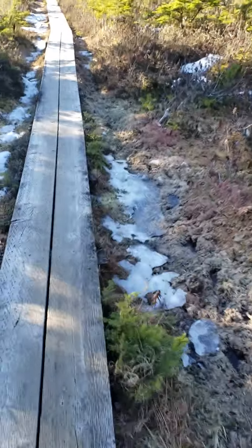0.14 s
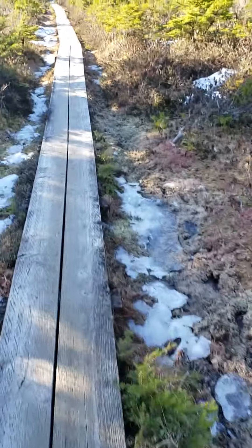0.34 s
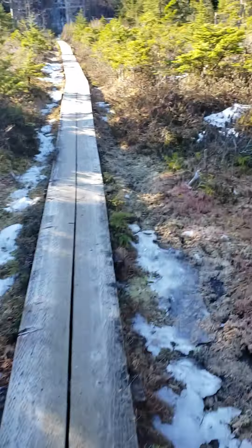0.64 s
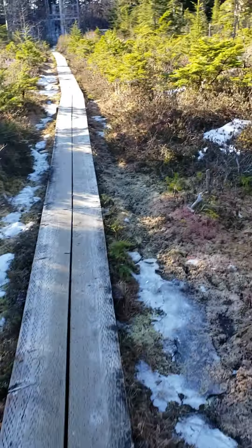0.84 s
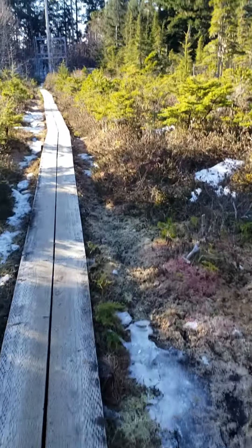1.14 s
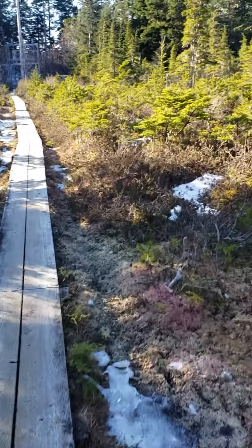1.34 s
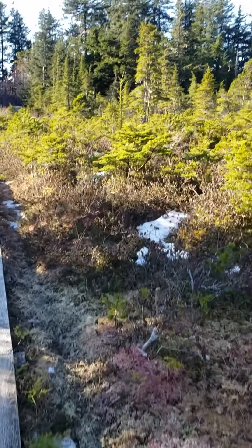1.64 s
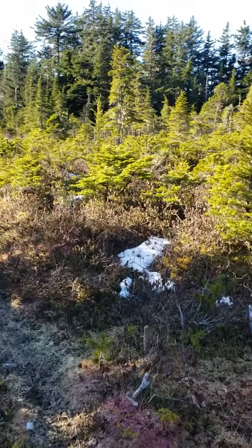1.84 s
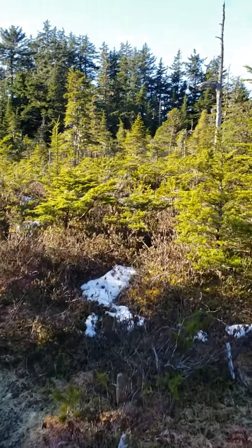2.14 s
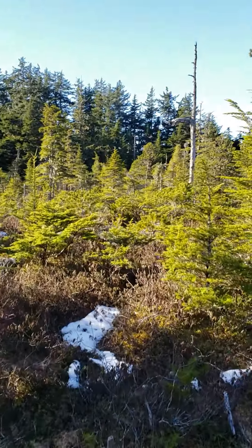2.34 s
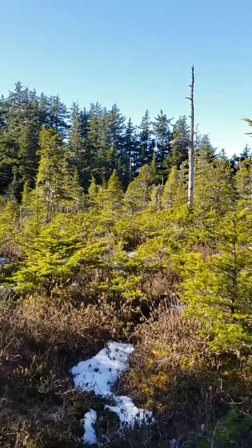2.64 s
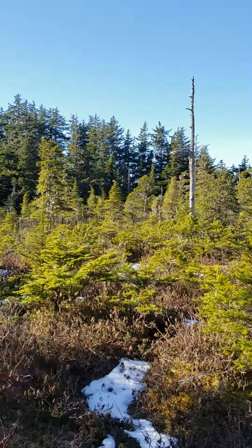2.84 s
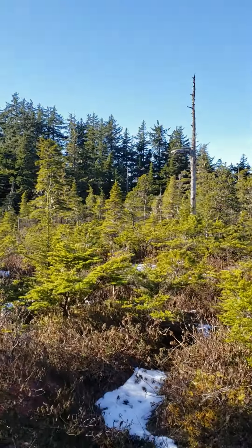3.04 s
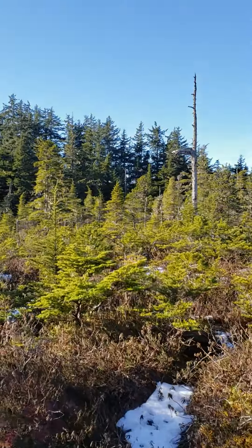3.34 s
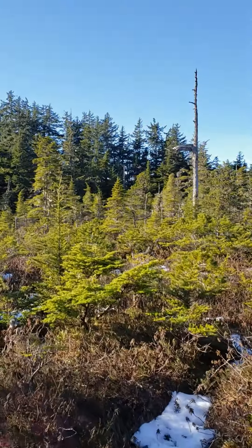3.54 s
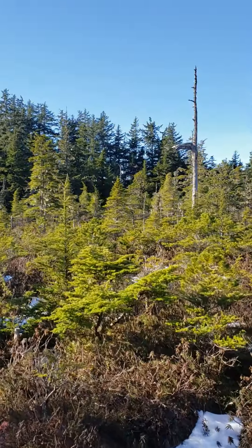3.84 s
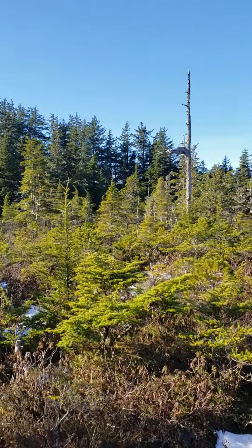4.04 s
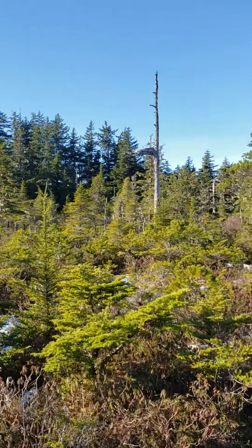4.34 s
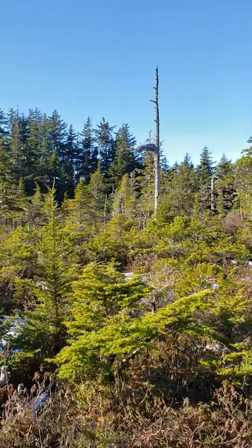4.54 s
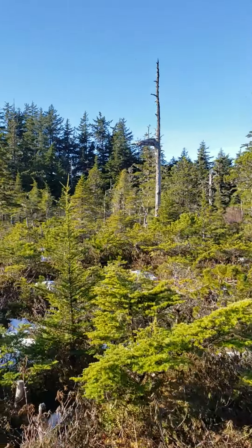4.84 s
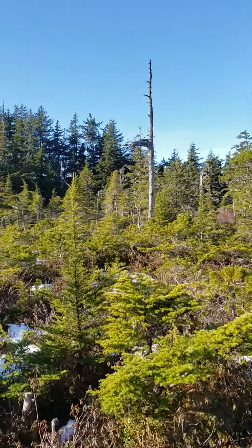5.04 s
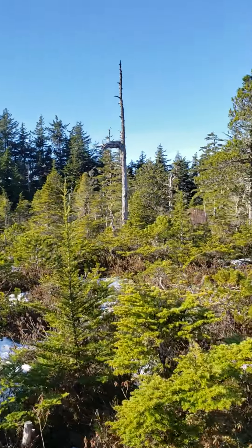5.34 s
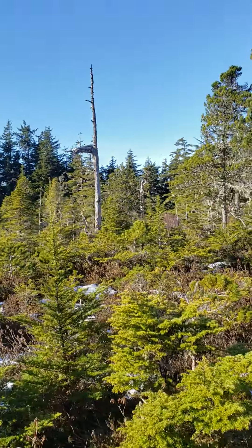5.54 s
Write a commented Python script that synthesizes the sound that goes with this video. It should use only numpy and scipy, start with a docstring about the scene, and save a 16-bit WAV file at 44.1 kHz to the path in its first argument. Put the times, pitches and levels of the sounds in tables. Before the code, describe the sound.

Close handheld phone pickup of a walker on wooden boards outdoors: about ten dull, resonant footfalls, roughly one every 0.57 seconds, with slight tread creaks and loose-plank taps. Short cloth swishes fall between the steps over thin jacket hiss. The air is nearly silent, a faint distant forest murmur, then low breeze buffets mainly the right channel. Sharp gritty crunches come near 2.3 and 3.4 seconds.

```python
"""Someone walks along a plank boardwalk over a bog, phone in hand, under a faint open-air murmur (noise).
From the start, heels and soles thud (sinking sines) and knock (ringing plank modes), treads creak,
loose planks knock in between, trouser legs swish and a jacket rustles (grains and coloured noise).
A sleeve whistles thinly (narrow noise) from about 1.1 s; soon after, a light breeze (low noise) starts
to buffet the right microphone. Grit cracks (bursts of grains) at 2.3 s and twice near 3.3 s."""
import sys
import numpy as np
from scipy import signal
from scipy.fft import rfft, irfft, next_fast_len
from scipy.io import wavfile
from scipy.ndimage import uniform_filter1d

SR = 44100
rng = np.random.default_rng(int(sys.argv[2]) if len(sys.argv) > 2 else 0)


def store_pcm(level_fs):
    """Save levels as 16-bit WAV."""
    pcm = np.round(np.clip(level_fs, -1, 1) * 32767).astype(np.int16)
    wavfile.write(sys.argv[1], SR, np.atleast_2d(pcm).T)


N = 250840
TIME = np.arange(N) / SR
AGE = np.arange(int(0.4 * SR)) / SR  # seconds since a blow

# jacket rustle: t/s, level/dB, top treble relative/dB, lower treble relative/dB (before trims)
JACKET_RUSTLE = [(0.0, -56, 3, -17), (0.2, -67, 1, -5), (0.37, -64, 2.5, 6.5), (0.64, -63, 1.5, -3),
                 (1.2, -65.5, 3, 7.5), (1.33, -59.5, 6.5, 2.5), (1.7, -67, 6, 3), (1.77, -74.5, 5.5, 8),
                 (2.28, -66.5, 0.5, -0.5), (2.32, -63.5, 2, 12.5), (2.85, -67, -1.5, -9),
                 (3.27, -69.5, 2, -15), (3.37, -63.5, 4.5, 5), (3.57, -63.5, 1, -24),
                 (4.52, -65.5, 2, -1.5), (4.76, -68, -2, -7), (4.92, -66.5, -1.5, -1),
                 (5.68, -68.5, -3.5, -8.5)]
# higher ringing modes of a plank: f/Hz, level/dB, t60/s (time to fall by 60 dB)
PLANK_MODES = [(386, 1, 0.12), (443.4, -0.5, 0.16), (501.6, 4.5, 0.06), (613, -2, 0.081), (677, -9.5, 0.22),
               (795, -0.5, 0.069), (913, -4, 0.032), (947, -6.5, 0.077), (1122, -1.5, 0.042),
               (1312, -7.5, 0.09), (1640, -40, 0.024), (2180, -18, 0.033)]
# heel strikes: t/s, thud/dB, pitch f/Hz, knock/dB, sag of the span/dB, ring t60/s (levels before trims)
HEEL_STRIKES = [(0.014, -21, 241.6, -56, -25, 0.045), (0.591, -29.5, 303.4, -47, -29, 0.093),
                (1.134, -25, 221, -54, -27, 0.032), (1.696, -27.5, 225, -54, -45, 0.069),
                (2.251, -23, 236, -51, -22, 0.067), (2.729, -24, 267, -52, -32, 0.045),
                (3.313, -30, 266.5, -41.5, -44, 0.15), (3.907, -29.5, 221, -49, -33.5, 0.053),
                (4.504, -24.5, 283, -51, -34.5, 0.036), (5.121, -30, 258, -54, -26.5, 0.052)]
# soles slapping down after the heel:
# t/s, thud/dB, pitch f/Hz, knock/dB, sag/dB, rub of the roll/dB (levels before trims)
SOLE_SLAPS = [(0.099, -42, 252, -51.5, -35, -69), (0.664, -41, 292, -52, -37, -67),
              (1.212, -38, 273, -51.5, -34, -72), (1.745, -42, 250, -57.5, -64, -59),
              (2.33, -36.5, 271, -46.5, -36.5, -60), (2.819, -35.5, 269, -59.5, -38, -56.5),
              (3.378, -24, 276, -40, -25, -52.5), (3.969, -26, 281, -49.5, -46, -53),
              (4.556, -30, 236, -46, -62, -53), (5.199, -39.5, 269, -53, -27, -61)]
SOLE_T60_S = 0.056


def undb(db):
    """Turn decibels into gain."""
    return 10 ** (np.asarray(db) / 20)


def unit(x):
    """Scale to an rms (average strength) of 1."""
    return x / np.sqrt(np.mean(x ** 2))


def colour(x, points):
    """Shape the spectrum with f/Hz, level/dB points, joined by lines over log frequency."""
    hz, db = np.transpose(points)
    size = next_fast_len(x.shape[-1] + SR // 10)
    f = np.maximum(np.fft.rfftfreq(size, 1 / SR), 1)
    gain = undb(np.interp(np.log(f), np.log(hz), db))
    return irfft(rfft(x, size) * gain, size)[..., :x.shape[-1]]


def noise(points):
    """Coloured noise, unrelated at the two microphone ports."""
    return unit(colour(rng.standard_normal((2, N)), points))


def walk(rate):
    """Smooth random wander with an rms of 1, taking about `rate` new values per second."""
    k = max(int(SR / rate), 1)
    steps = np.repeat(rng.standard_normal(N // k + 1), k)
    return unit(uniform_filter1d(steps, k)[:N])


def curve(rows):
    """Draw each column of a timed table as a line, sample by sample."""
    s, *columns = np.transpose(rows)
    return [np.interp(TIME, s, c) for c in columns]


def bump(s, width_s):
    """A smooth swell that peaks at time s."""
    return np.exp(-((TIME - s) / width_s) ** 2 / 2)


def fade(t60):
    """Exponential decay after a blow, down 60 dB after t60 seconds."""
    return np.exp(-np.log(1000) * AGE / t60)


def onset(rise_s):
    """Smooth build-up after a blow."""
    return 1 - np.exp(-(AGE / rise_s) ** 2)


def add(track, s, sound):
    """Mix a sound into a track at time s."""
    i = max(int(s * SR), 0)
    track[i:i + len(sound)] += sound[:N - i]


def grains(per_s, scatter_db):
    """A stream of tiny slips at random moments, of uneven size and random sign."""
    size = undb(scatter_db * np.minimum(rng.exponential(size=N), 3))
    happens = rng.random(N) < per_s / SR
    return rng.choice([-1, 1], N) * size * happens


def from_below(x):
    """Sound from the feet reaches the right port a moment before the left."""
    # lag of the left port behind the right: f/Hz, lag/s
    port_lag = [(300, 0.00022), (900, 0.00035)]
    size = next_fast_len(N + SR // 10)
    f = np.fft.rfftfreq(size, 1 / SR)
    lag = np.interp(f, *np.transpose(port_lag))
    left = irfft(rfft(x, size) * np.exp(-2j * np.pi * f * lag), size)[:N]
    return np.array([left, x])


def bog(level_db=-66):
    """Faint murmur of the distant forest: noise partly shared by both ports, slowly swelling."""
    # spectrum of the murmur: f/Hz, level/dB
    bog_colour = [(20, -3), (65, 6), (150, -12), (300, -7.5), (600, -17.5), (1200, -19), (2500, -28.5),
                  (5000, -48), (16000, -36)]
    air = from_below(noise(bog_colour)[0]) + 0.89 * noise(bog_colour)
    swell_db = 1.5 * walk(3)
    return air * undb(level_db + swell_db)


def breeze(left_db=-2, right_db=-1, eddy_db=2.5):
    """Eddies rumble on the right port; the sheltered left one catches more when a step jolts the phone."""
    # strength of the breeze at the phone, before trims: t/s, level/dB
    gusts = [(0.0, -75), (1.16, -67), (1.46, -42), (1.58, -52), (1.75, -37.5), (2.16, -67), (2.39, -71),
             (2.54, -40), (2.86, -29.5), (3.13, -35.5), (3.23, -42), (3.51, -38), (3.82, -52.5),
             (4.05, -32.5), (4.24, -50.5), (5.04, -32.5), (5.41, -39), (5.68, -35.5)]
    # spectrum of the rumble: f/Hz, level/dB
    breeze_colour = [(15, -44), (35, -11), (50, 2.5), (72, 3), (105, -3.5), (150, -15), (220, -27.5),
                     (350, -37), (700, -62), (2000, -94)]
    jolt_after_s, jolt_width_s = 0.11, 0.11
    jolt_top_db, lee_db = -48, -32.5  # ceiling of the jolted air; shelter of the left port; before trims
    gust, = curve(gusts)
    jolt = sum(bump(heel[0] + jolt_after_s, jolt_width_s) for heel in HEEL_STRIKES)
    rumble = noise(breeze_colour) * undb(eddy_db * walk(14))
    lee = colour(rumble[0], [(75, -2), (160, -7.0), (400, -10)])
    left = undb(gust + lee_db) + jolt * undb(np.minimum(gust, jolt_top_db))
    return np.array([lee * left * undb(left_db), rumble[1] * undb(gust + right_db)])


def sleeve(width=0.066):
    """As the arm turns, woven ribs slide over each other and whistle in a narrow band."""
    # slides of the sleeve: t/s at the loudest, level/dB, pitch f/Hz, half length/s
    slides = [(1.16, -67, 4530, 0.031), (1.412, -77, 4800, 0.15)]
    step = 1 + width  # frequency ratio from the centre to the edge of the band
    out = np.zeros((2, N))
    for s, db, hz, length in slides:
        band = [(hz / step ** 3, -35), (hz / step, -6), (hz, 0), (hz * step, -6), (hz * step ** 3, -35)]
        out += noise(band) * undb(db) * bump(s, length)
    return out


def resonance(level_db=-14, swell_db=2):
    """A narrow band of the rustle stands out, swelling and fading."""
    # spectrum of the narrow band: f/Hz, level/dB
    resonance_colour = [(1900, -27), (2200, 3), (2300, 4), (2400, -2.5), (2700, -30)]
    db, _, body = curve(JACKET_RUSTLE)
    return noise(resonance_colour) * undb(db + body / 2 + level_db + swell_db * walk(7.7))


def jacket(level_db=-1.5, top_db=1.5, lower_db=2, flutter_db=1.42):
    """A fine fabric hiss near the phone; its colour shifts as folds move and it eases after each heel."""
    # spectrum of the hiss: f/Hz, level/dB
    jacket_colour = [(300, 9.5), (1200, 7.5), (2300, -0.5), (2650, -2.5), (3700, -6.5), (4700, -5.5),
                     (6000, 1.5), (8000, 3), (16000, 6)]
    lull_after_s, lull_width_s, lull_db = 0.2, 0.068, -3
    db, bright, body = curve(JACKET_RUSTLE)
    lull = sum(bump(heel[0] + lull_after_s, lull_width_s) for heel in HEEL_STRIKES)
    hiss = noise(jacket_colour)
    top = colour(hiss, [(7000, -40), (9000, 0)])
    lower = colour(hiss, [(1200, -12), (2200, 0), (5000, 0), (6500, -20)])
    # the top is turned up or down; the lower treble is added on top
    hiss = hiss + top * (undb(bright + top_db) - 1) + lower * undb(body + lower_db)
    return hiss * undb(db + level_db + lull_db * lull + flutter_db * walk(60))


def trousers(level_db=-2, catch_db=3.5, spread=0.74, rise=1.2, fall=0.88):
    """Cloth slides over cloth in mid-stride, catching and slipping thread by thread."""
    # strokes of the legs, before trims:
    # t/s at the loudest, level/dB, half length/s before stretching, crisp edge relative/dB
    swishes = [(0.079, -63, 0.025, 0.5), (0.374, -56.5, 0.034, -5.5), (0.835, -57, 0.012, -13),
               (0.926, -51.5, 0.024, -26), (1.494, -57, 0.014, -14), (1.971, -59, 0.027, -19),
               (2.053, -54.5, 0.015, -21), (2.613, -60.5, 0.016, -20.5), (3.162, -58, 0.024, -28),
               (3.763, -58.5, 0.019, -14.5), (4.35, -52.5, 0.014, -33.5), (4.91, -65, 0.032, -13),
               (5.476, -54, 0.011, -28)]
    # spectrum of the cloth: f/Hz, level/dB
    trouser_colour = [(150, 0), (320, 6), (600, 1), (950, 5.5), (1300, 4.5), (1650, 2), (2200, -9.5),
                      (3200, -23.5), (5000, -33), (8000, -21), (16000, -40)]
    # spectrum of the crisp edge: f/Hz, level/dB
    edge_colour = [(1200, -20), (2000, 1), (3000, 14), (4500, 2.5), (7000, -3), (16000, -53)]
    snags_per_s, snag_db = 140, -5.5  # threads that snag and let go with a small tick
    slide, edge = np.zeros(N), np.zeros(N)
    for s, db, length, crisp in swishes:
        half_length = length * np.where(TIME < s, rise, fall)
        stroke = undb(db) * np.exp(-np.abs((TIME - s) / half_length) ** 1.28 / 2)
        slide += stroke
        edge += stroke * undb(crisp)
    threads = []
    for path in range(3):  # one shared by both ports, then one for each
        slips = unit(grains(900, 5.4))
        snags = undb(snag_db) * unit(grains(snags_per_s, 2.7))
        threads.append(unit(colour(slips + snags, trouser_colour)))
    cloth = from_below(threads[0]) + spread * np.array(threads[1:])
    catching = undb(catch_db * walk(110))
    return (cloth * slide * catching + noise(edge_colour) * edge) * undb(level_db)


def grit(crack_t60=0.019, tail_db=-26, level_db=1):
    """Grit under a sole cracks sharply and crumbles into tiny fragments."""
    # cracks, before the level trim: t/s, level/dB
    cracks = [(2.328, -35.5), (3.313, -56), (3.379, -39.5)]
    # spectrum of the fragments: f/Hz, level/dB
    grit_colour = [(300, -13), (900, 9), (2000, 15.5), (3500, -5), (6000, -3.5), (11000, -3), (16000, 8.5)]
    crush = np.zeros(N)
    snap, crumble = onset(0.0003), fade(0.2)
    for s, db in cracks:
        add(crush, s, undb(db + level_db) * snap * (fade(crack_t60) + undb(tail_db) * crumble))
    fragments = np.array([grains(6000, 3) for port in range(2)])
    return crush * unit(colour(fragments, grit_colour))


def bending_wave(hz, t60, glide=1.0, glide_s=0.0029, sink=0.95, rise_s=0.0072, after_db=-23, after_t60=0.32):
    """Short bending waves run fastest along a plank, so the thud sinks in pitch; nearby boards ring on."""
    cycles = hz * (sink * AGE + glide * glide_s * (1 - np.exp(-AGE / glide_s)))
    swell = 0.23 * onset(0.0048) + onset(rise_s)
    direct = -np.sin(2 * np.pi * cycles) * swell * fade(t60)
    boards = 0
    for f in (189.4, 221.1, 253.5, 295.0):
        board_hz = f * (1 + 0.0286 * rng.standard_normal())
        boards = boards + np.sin(2 * np.pi * (board_hz * AGE + rng.random()))
    return direct + undb(after_db) * boards * onset(0.0053) * fade(after_t60)


def roll(level_db=-3, body_db=6, slips_per_s=500, scatter_db=3.5):
    """As the shoe rolls flat its tread sticks and slips, and every slip rings the plank."""
    width_s, after_s, sole_hz = 0.034, 0.019, 267.3  # the rub peaks just after the sole lands
    pressure = sum(undb(db) * bump(s + after_s, width_s) for s, *_, db in SOLE_SLAPS)
    modes = 0
    for hz, db, t60 in PLANK_MODES:
        # the shoe's tread damps the plank: half the ring time
        modes = modes + undb(db) * rng.choice([-1, 1]) * np.sin(2 * np.pi * hz * AGE) * fade(t60 / 2)
    slips = grains(slips_per_s, scatter_db)
    creak = unit(signal.fftconvolve(slips, modes)[:N])
    body = unit(signal.fftconvolve(slips, bending_wave(sole_hz, SOLE_T60_S))[:N])
    return from_below((creak + undb(body_db) * body) * pressure * undb(level_db))


def span_sag():
    """The whole span bounces under the walker's weight; no two spans are quite alike."""
    # bounce of a span between its sleepers, before its stiffness varies: f/Hz, level/dB, t60/s
    span_modes = [(100, -16, 0.32), (125, -1.5, 0.12)]
    stiffness = 1 + 0.05 * rng.standard_normal()
    bounce = sum(undb(db) * np.sin(2 * np.pi * hz * stiffness * AGE) * fade(t60)
                 for hz, db, t60 in span_modes)
    return onset(0.0042) * bounce


def knock(settle_db=-25):
    """A blow rings the plank and settles in small taps; each spot favours other modes."""
    ring = 0
    for hz, db, t60 in PLANK_MODES:
        strength = undb(db + 2.26 * rng.standard_normal()) * rng.choice([-1, 1])
        mode_hz = hz * (1 + 0.042 * rng.standard_normal())
        ring = ring + strength * fade(t60) * np.sin(2 * np.pi * mode_hz * AGE)
    taps = undb(settle_db) * grains(700, 2)[:len(AGE)] * fade(0.14)
    taps[0] = 1  # the blow itself
    sound = signal.fftconvolve(taps, ring)[:len(AGE)]
    return sound / np.sqrt(np.mean(sound[AGE < 0.014] ** 2))  # rms 1 over the first 14 ms


def blows():
    """List heels, soles and loose planks; after a firm blow the plank drops back once, more softly."""
    # loose planks knocking on their sleepers as the weight shifts, before trims:
    # t/s, thud/dB, pitch f/Hz, knock/dB, sag/dB
    loose_planks = [(0.346, -40, 246, -52, -45), (0.442, -44, 277, -59.5, -51),
                    (0.474, -39.5, 280, -45.5, -51), (0.502, -43, 249, -59, -58),
                    (0.935, -26.5, 265, -47, -38.5), (1.016, -42.5, 291, -53, -70),
                    (1.18, -45, 273, -61, -30), (1.542, -37, 275.5, -50, -35), (1.62, -41, 264, -54, -44),
                    (1.779, -49, 272, -59, -64), (2.115, -34, 252, -50.5, -43),
                    (2.196, -37.5, 246, -52.5, -66), (2.313, -36, 241, -48.5, -33),
                    (2.86, -38, 280, -63, -38), (2.906, -34.5, 271.6, -49.5, -44),
                    (3.464, -40.5, 309, -51.5, -41.5), (3.993, -46, 260, -50, -62),
                    (4.342, -42.5, 323, -51.5, -62), (4.609, -39.5, 223, -50.5, -44),
                    (4.659, -39, 255, -85, -54), (5.472, -48, 267, -53.5, -57)]
    loose_t60_s = 0.065
    rebound_s, rebound_spread, firmer_by_db = 0.045, 0.25, 7
    # rebound: thud/dB, pitch f/Hz, knock/dB, sag/dB, t60/s
    rebound = (-48.5, 269.8, -59.5, -53, loose_t60_s)
    soles = [(*sole[:5], SOLE_T60_S) for sole in SOLE_SLAPS]
    loose = [(*plank, loose_t60_s) for plank in loose_planks]
    first = [*HEEL_STRIKES, *soles, *loose]
    delays = rebound_s * np.exp(rebound_spread * rng.standard_normal(len(first)))
    rebounds = [(blow[0] + delay, *rebound) for blow, delay in zip(first, delays)
                if blow[1] > rebound[0] + firmer_by_db]
    return first + rebounds


def footsteps(ring_db=4, sag_db=0, knock_db=0, scuff_db=-1):
    """Every blow bends the plank, rocks the span, knocks and scuffs the grain of the wood."""
    # spectrum of the scuff: f/Hz, level/dB
    scuff_colour = [(150, -32), (450, -24), (900, 10), (1500, 6), (3000, -22), (8000, -26), (16000, -19)]
    wood, rub = np.zeros(N), np.zeros(N)
    contact = onset(0.0005) * (fade(0.02) + 0.16 * fade(0.2))
    for s, thud, hz, hard, sag, t60 in blows():
        add(wood, s, undb(thud + ring_db) * bending_wave(hz, t60))
        add(wood, s, undb(sag + sag_db) * span_sag())
        add(wood, s, undb(hard + knock_db) * knock())
        add(rub, s, undb(hard + scuff_db) * contact)
    scuff = rub * unit(colour(grains(4000, 0.73), scuff_colour))
    return from_below(wood + scuff)


def scene():
    """Add up the open air and the walker."""
    air = bog() + breeze()
    clothes = sleeve() + resonance() + jacket() + trousers()
    return air + clothes + grit() + roll() + footsteps()


def record(dry):
    """Each port colours the sound in its own way; the phone cuts the top."""
    # response of the left microphone port: f/Hz, level/dB
    left_port = [(60, -2), (250, 5), (1200, -0.5), (2300, 2.5), (3800, 4.5), (5500, 8.5), (7000, 13.5),
                 (7750, 3.5), (8100, -8), (9300, -6), (14300, -4.5), (15500, -1.5)]
    # response of the right microphone port: f/Hz, level/dB
    right_port = [(60, -2.5), (250, 2), (1200, -5), (2300, -9.5), (4500, -1.5), (5700, -11.5), (7200, -9),
                  (7750, -23), (8100, -14), (9100, -4.5), (12500, 4.5), (14200, 2), (15500, 6)]
    top_hz = 15700
    ports = np.array([colour(dry[0], left_port), colour(dry[1], right_port)])
    top_cut = signal.ellip(10, 0.2, 70, top_hz, fs=SR, output="sos")
    return signal.sosfilt(top_cut, ports)


dry = scene()
out = record(dry)
store_pcm(out)
```